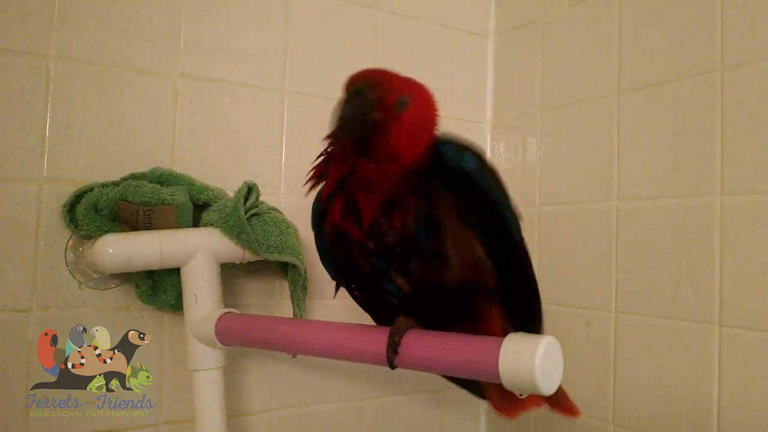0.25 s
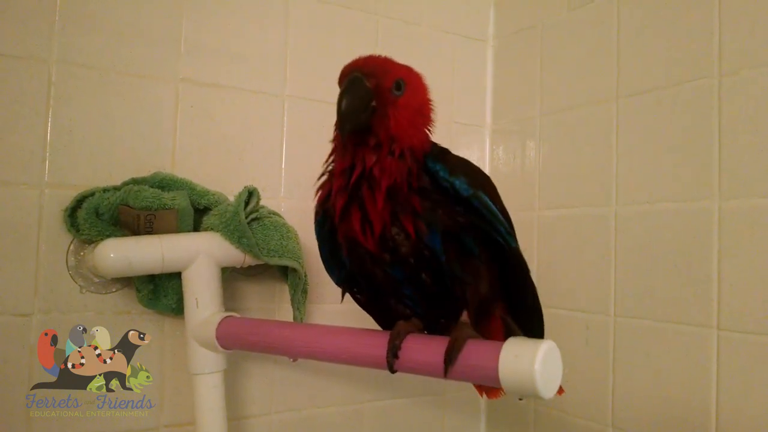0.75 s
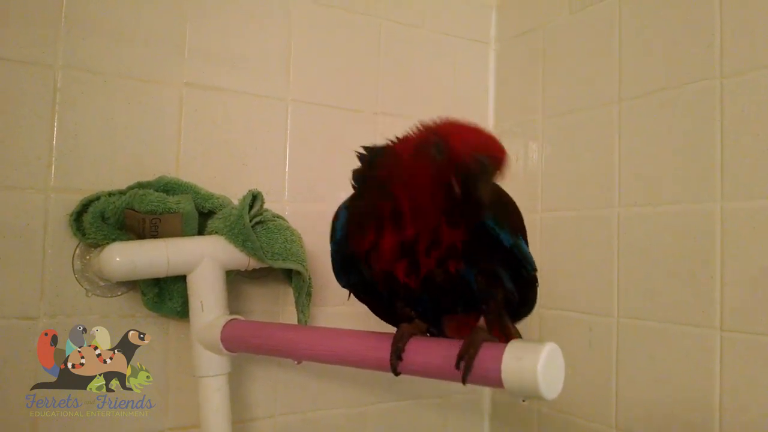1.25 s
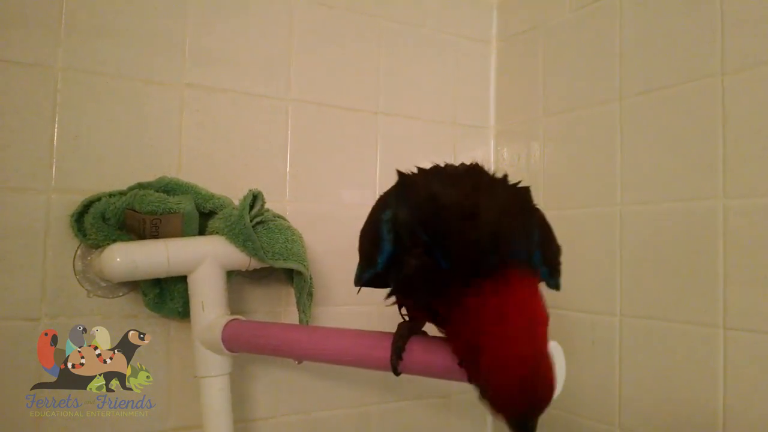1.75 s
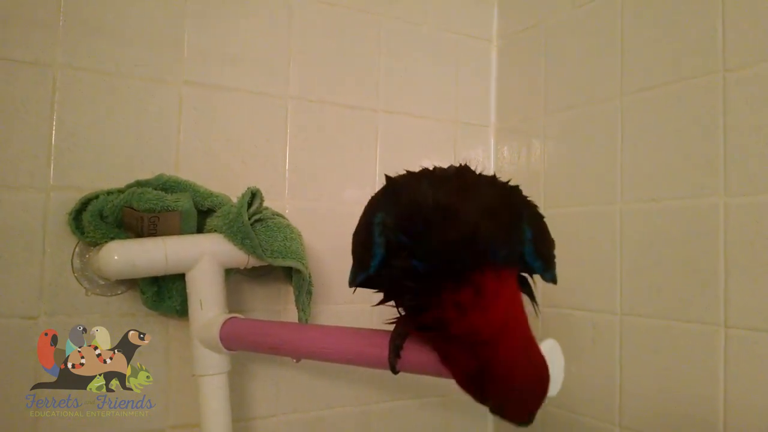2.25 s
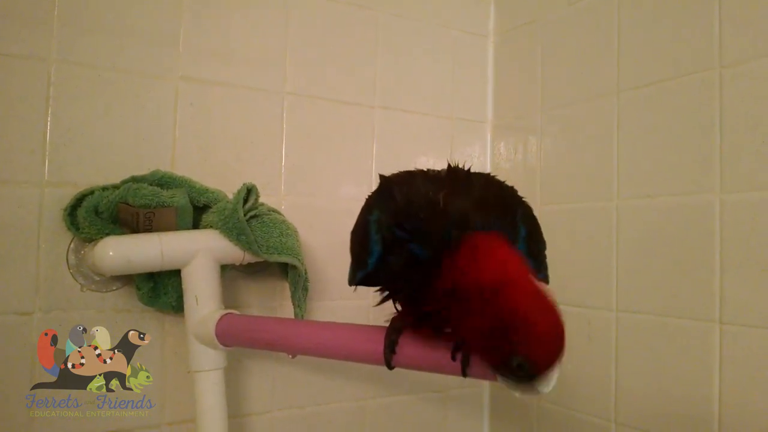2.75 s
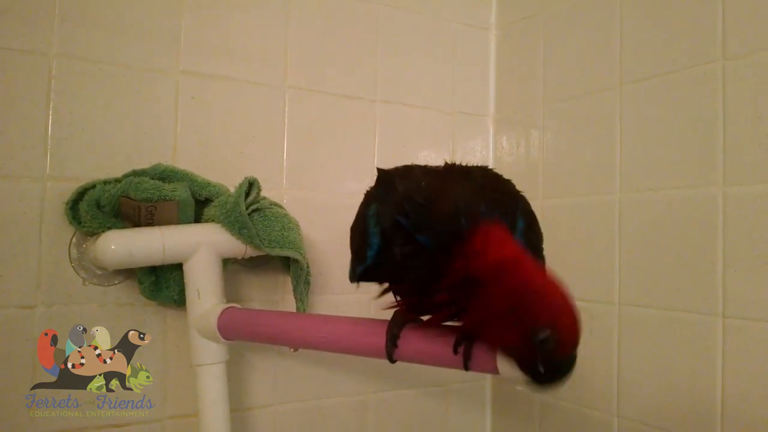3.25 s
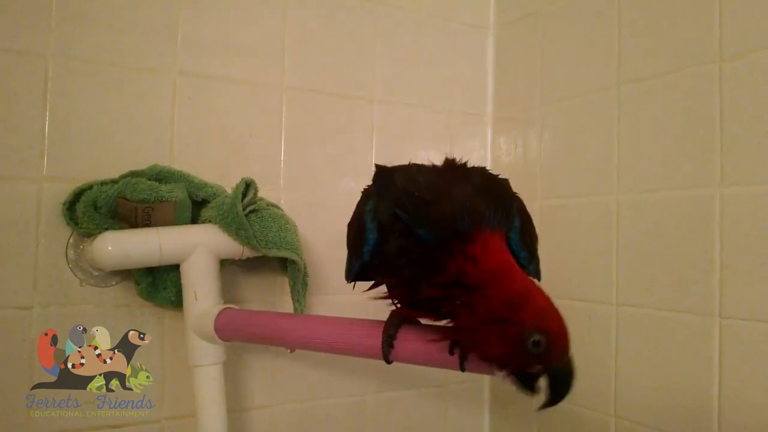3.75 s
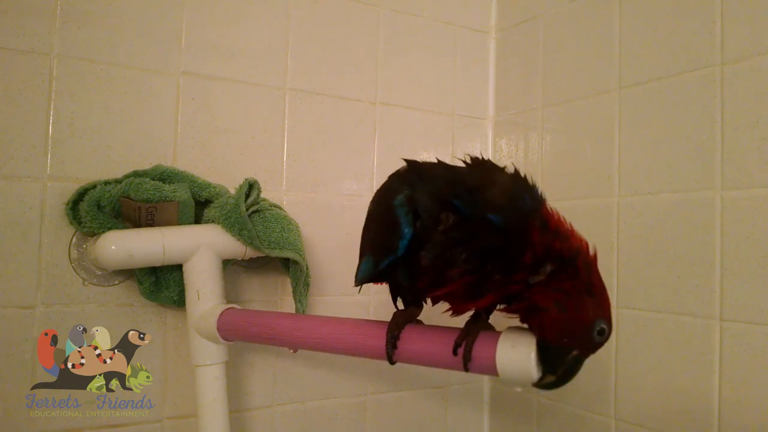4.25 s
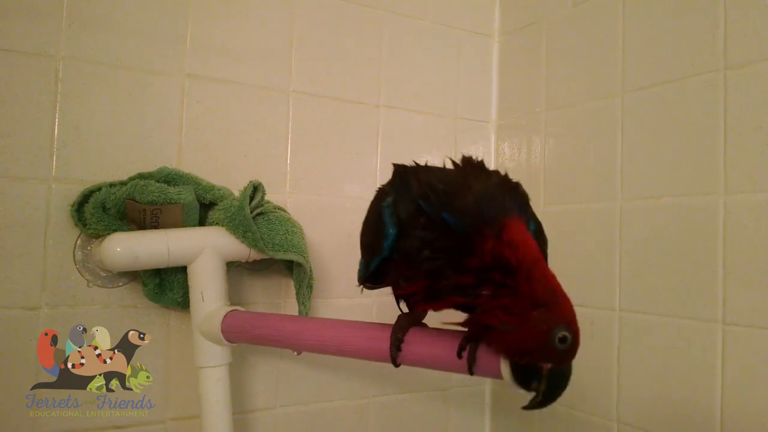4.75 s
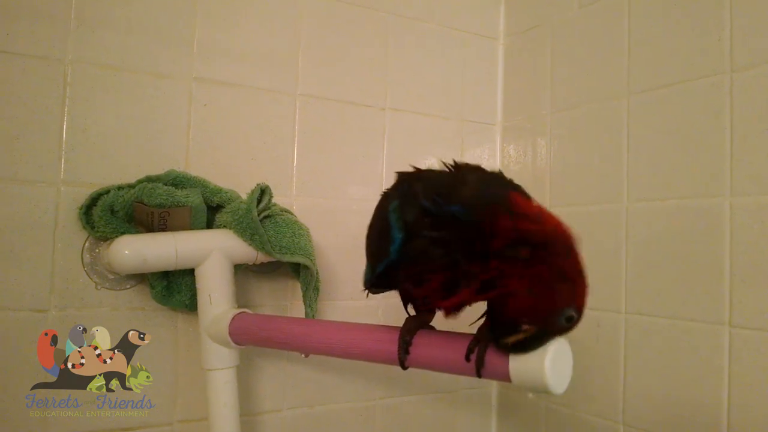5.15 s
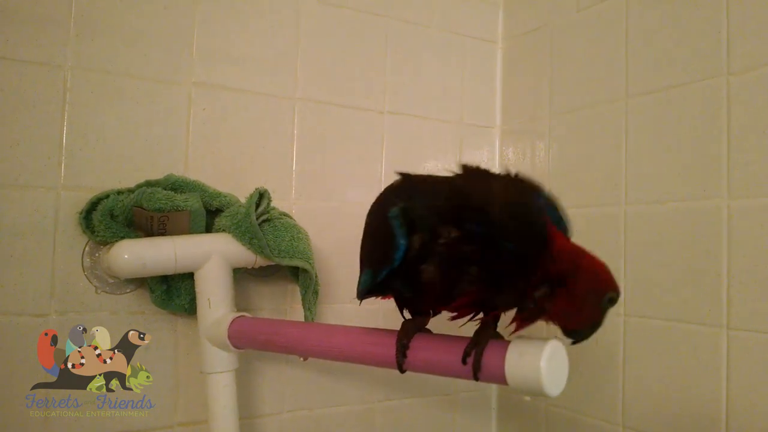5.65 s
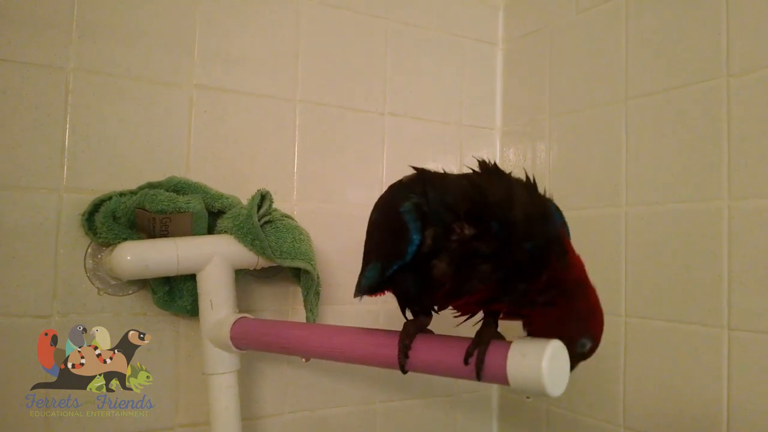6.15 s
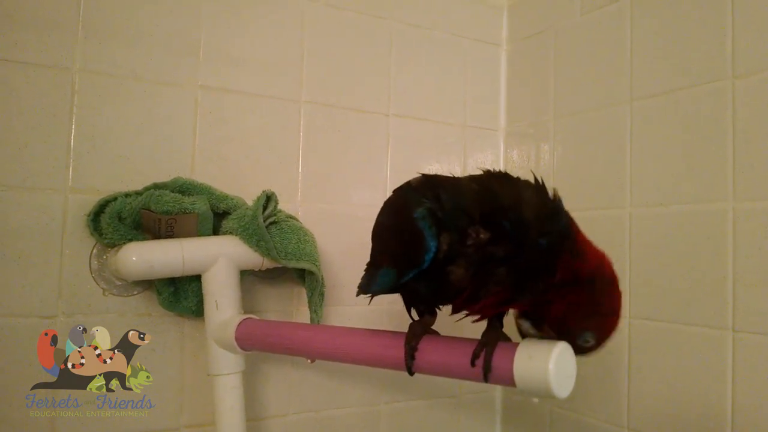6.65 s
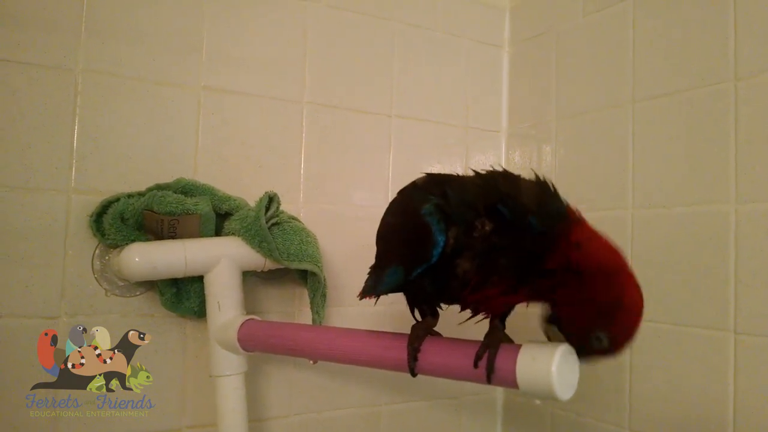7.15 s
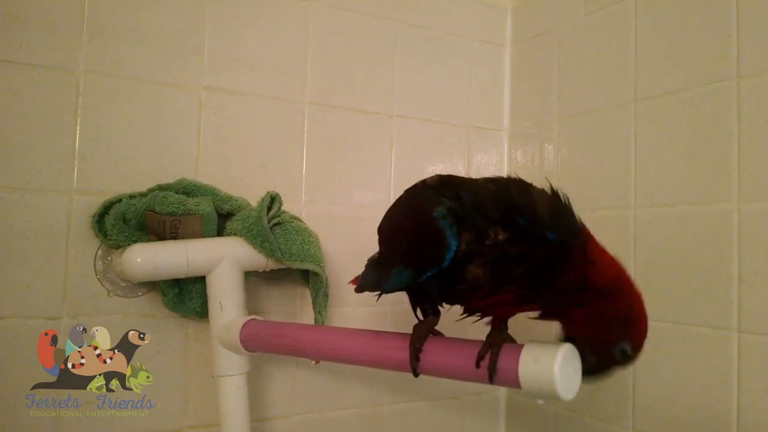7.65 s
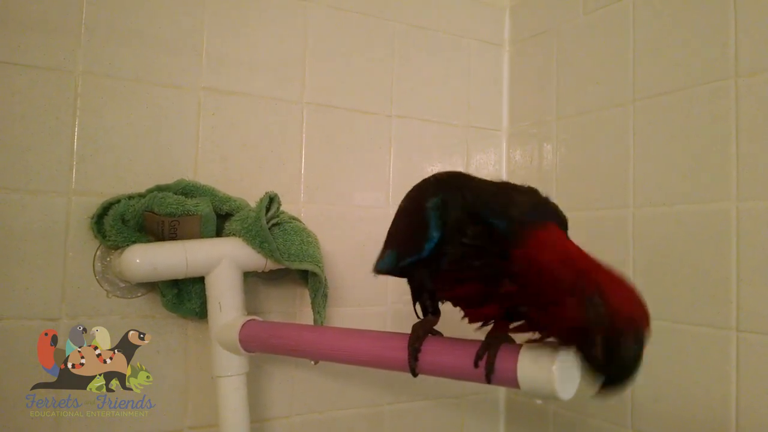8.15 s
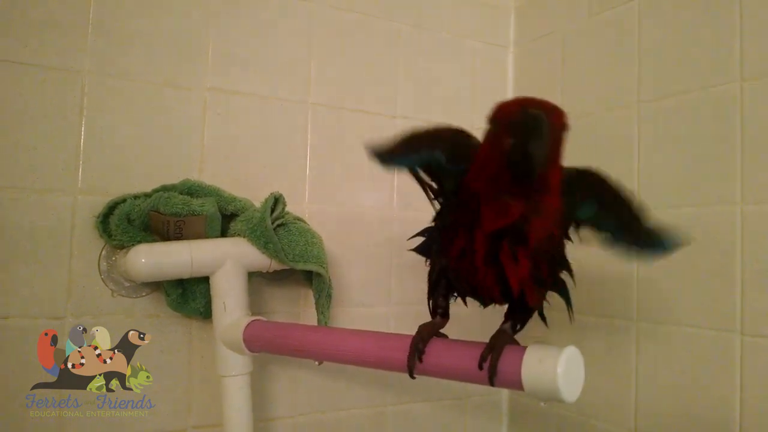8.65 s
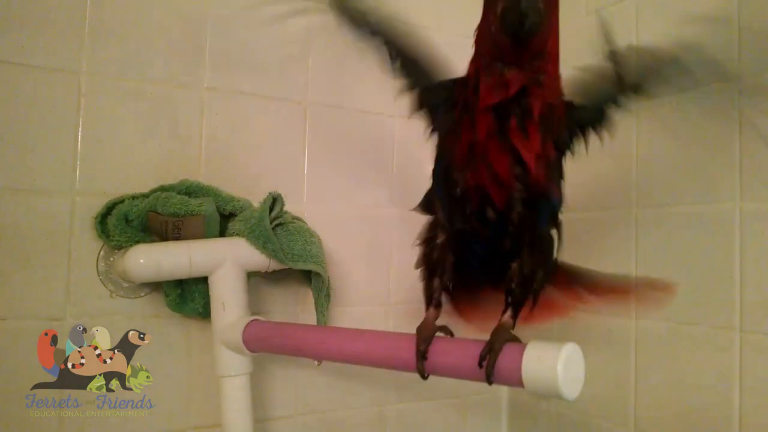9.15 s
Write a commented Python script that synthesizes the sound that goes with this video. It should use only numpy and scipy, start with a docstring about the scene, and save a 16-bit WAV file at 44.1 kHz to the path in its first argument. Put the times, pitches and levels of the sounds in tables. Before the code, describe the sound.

A wet parrot ruffles, taps and wipes its beak on a plastic perch, then flaps, over a fan droning in a tiled shower.

```python
"""A fan drones and water drips in a tiled shower stall while a wet parrot shakes itself, taps and
wipes its beak on a plastic perch and at last beats its wings. The extractor fan makes the air in the
stall ring. Taps and rubs make the perch ring, drops sound as tiny bubbles, and all three echo off the
tiles. Wet feathers swish, crackle and push air. A microphone with two openings (ports) widens it all."""
import sys
import numpy as np
from scipy import signal
from scipy.fft import rfft, irfft, next_fast_len
from scipy.io import wavfile
from scipy.ndimage import map_coordinates

SR = 44100
rng = np.random.default_rng(int(sys.argv[2]) if len(sys.argv) > 2 else 0)


def transcribe(signal):
    """Save signal, clipped to [-1, 1], as a 16-bit WAV file at the path in sys.argv[1]."""
    frames = np.atleast_2d(signal).T
    limited = np.clip(frames, -1, 1)
    pcm = np.round(limited * 32767).astype(np.int16)
    wavfile.write(sys.argv[1], SR, pcm)


N = 414981

# Beak and claws tap the perch; at the end wing feathers snap. Treble and knock are against the main ring.
# (time [s], peak [dB], treble [dB], knock [dB], wipe level [dB], contact length [s]: short is hard)
TAPS = [(0.48, -18.5, -18, -22, -61, 0.00053), (0.578, -32.5, 2, -28, -54.5, 0.0016),
        (1.465, -32, 5, -12, -54, 0.001), (1.835, -31.5, -4, -16, -59, 0.001),
        (2.158, -16.5, -31, -8, -40.5, 0.00094), (2.198, -24, -0.5, -7, -44.5, 0.0035),
        (2.54, -37, -13, -23, -74, 0.0012), (2.567, -37, -18, -10, -75, 0.00092),
        (2.705, -31.5, 0, -20, -73, 0.0012), (2.82, -31, -21, 6, -64, 0.0021),
        (3.3876, -20, -33, -8.5, -57, 0.00032), (4.0786, -14, -3, -13.5, -42.5, 0.0012),
        (4.201, -18, 0.5, -5.5, -48.5, 0.0012), (4.95, -36, -14, -31, -70, 0.0011),
        (4.9555, -27.5, -8, -36, -54, 0.00064), (5.071, -21, -2.5, -2.5, -52, 0.00088),
        (5.321, -29, 16, -19, -55, 0.0013), (5.562, -26, 3, 7, -53, 0.0035),
        (5.636, -26.5, -23, -34, -48.5, 0.0013), (5.943, -35, -12, -25, -54, 0.0011),
        (6.0882, -18, -2.5, -11.5, -40.5, 0.0021), (6.095, -25, -10, -13, -60, 0.0014),
        (6.108, -16.5, -9, -10, -57, 0.00074), (6.203, -13, 5.5, -12, -46, 0.00078),
        (6.332, -24, -23, -10, -40.5, 0.0024), (6.343, -26, -22, -10, -60, 0.0013),
        (6.365, -27.5, -20, 3, -58, 0.0018), (6.379, -14.5, -8, -14, -44, 0.00068),
        (6.449, -29.5, 31, -17, -46.5, 0.0032), (6.49, -24, -3, -20, -42.5, 0.0051),
        (6.498, -22.5, -10, -17, -60, 0.00091), (6.625, -26, -22, -10, -40.5, 0.004),
        (6.637, -20.5, -21, -5, -60, 0.0027), (6.652, -26, -20, -2, -57, 0.0028),
        (6.6695, -12, -10, -10, -46.5, 0.00078), (6.809, -26.5, 3.5, -4, -68, 0.0021),
        (6.903, -37, 4, -23, -44.5, 0.0018), (7.12, -24, -14, -30, -58, 0.0014),
        (7.2998, -27.5, 5, 0, -50, 0.0012), (7.65, -26.5, 22, -19, -55, 0.0024),
        (7.9593, -16, 7.5, -3.5, -47.5, 0.00089), (7.974, -29.5, -10, 15, -70, 0.0034),
        (8.142, -23.5, -1, -7, -52, 0.0018), (8.551, -25, 7, -12, -55, 0.0017),
        (8.666, -27, -8, 15, -57, .001), (8.935, -19, 28, -25, -60, .002),
        (8.981, -18, 1, -23, -60, 0.0017), (9.02, -24, 4, -22, -60, .004), (9.025, -21, 10, -29, -60, .001),
        (9.04, -14, 7, -18, -60, .003), (9.137, -20, 3, -26, -60, 0.0013), (9.181, -18, 1, -17, -60, .0011),
        (9.248, -28, 1, -2, -60, 0.0021), (9.319, -18, -5, -18, -60, 0.0012),
        (9.358, -15.5, 1.5, -12, -60, 0.001)]
# Overlapping swells of feather swish that make up about three wing beats: (time [s], level [dB])
SWISH_SWELLS = [(8.94, -45), (8.985, -39.5), (9.018, -37), (9.045, -40), (9.085, -39.5), (9.145, -38),
                (9.175, -42), (9.25, -40), (9.322, -35), (9.36, -46), (9.405, -44)]
# How the microphone's housing shades the bird: (frequency [Hz], left port against right [dB])
BIRD_SHADE = [(500, 4.5), (2000, -2), (4500, -20.5), (7000, -6.5), (9500, -20), (15000, -7)]
RUB_TIME = np.arange(-4410, 4410) / SR  # seconds before and after the moment of a rub


def amp(db):
    """Turns decibels into a gain."""
    return 10 ** (np.asarray(db) / 20)


def along(points, hz):
    """Reads a curve of (frequency, value) points on a log frequency axis."""
    f, v = np.transpose(points)
    return np.interp(np.log(hz + 1), np.log(f + 1), v)


def wobble(rate):
    """A smooth random curve through `rate` points a second."""
    return map_coordinates(rng.standard_normal(int(N * rate / SR) + 4), [np.arange(N) * rate / SR])


def filtered(x, response):
    """Scales and delays each frequency of x as `response` says."""
    m = next_fast_len(x.shape[-1] + 8192)
    return irfft(rfft(x, m) * response(np.fft.rfftfreq(m, 1 / SR)), m)[..., :x.shape[-1]]


def resonance(f, hz, width):
    """A filter that rings at hz, with a peak gain of 1."""
    return 1j * f * width / (hz * hz - f * f + 1j * f * width)


def shaded(pair, shade):
    """The housing changes the tone at the left port only."""
    return filtered(pair, lambda f: [amp(along(shade, f)), np.ones_like(f)])


def diffuse(pair, spectrum, shade):
    """Two unrelated noises become sound from all around, alike at both ports in the bass."""
    # How alike the ports sound: (frequency [Hz], likeness [0 to 1])
    likeness = [(25, 0.99), (100, 0.98), (550, 0.99), (800, 0.56), (1300, 0.034), (3000, 0.11)]
    turn = lambda f: np.arccos(along(likeness, f)) / 2
    mid, side = filtered(pair, lambda f: amp(along(spectrum, f)) * [np.cos(turn(f)), np.sin(turn(f))])
    return shaded(np.array([mid + side, mid - side]), shade)


def place(out, start, sound, wet_db):
    """Adds a sound to both ports, with tile echoes at wet_db against it."""
    # Echoes off the tiles: (frequency [Hz], time to fade by 60 dB [s])
    fade_times = [(300, 0.16), (2000, 0.23), (6000, 0.15), (13000, 0.0057)]
    hz, t, noise = signal.stft(rng.standard_normal((2, SR // 4)), SR, nperseg=128)
    tail = signal.istft(noise * amp(-60 * t / along(fade_times, hz)[:, None]), SR, nperseg=128)[1]
    tail /= np.linalg.norm(tail[1])
    pair = amp(wet_db) * signal.fftconvolve(np.pad(sound, (90, 0))[None], tail, axes=1)
    pair[0, 5:len(sound) + 5] += sound  # reaches the left port 5 samples later
    pair[1, :len(sound)] += sound
    out[:, max(round(start * SR), 0):][:, :pair.shape[1]] += pair


def perch(force, treble_db, bare_db, knock_db=-30):
    """A touch rings the hollow plastic pipe; its own bare, bright sound lies on top."""
    # The pipe's knock, main ring, upper ring and the beak edge's treble: (pitch [Hz], width [Hz])
    rings = [(1590, 4300), (3750, 3230), (6500, 2400), (9560, 1440)]
    knock, main, upper, edge = rings
    ringing = filtered(force, lambda f: (
        resonance(f, *main) ** 2
        - amp(knock_db) * resonance(f, *knock) ** 2
        - amp(-6.5 + 0.85 * treble_db) * resonance(f, *upper)
        + amp(treble_db) * resonance(f, *edge) * f / (f - 5000j)))
    return ringing + amp(treble_db + bare_db) * np.diff(force, 2, append=[0, 0])


def fan():
    """Fan noise rings the air in the stall at many pitches, with a hiss around them."""
    # The stall's resonances: (pitch [Hz], width [Hz], level [dB], right port against left [dB])
    stall = [(25.5, 6, -61.5, 0.5), (93, 8, -63, 2), (119.3, 6.1, -61.5, 1.5), (138, 17.5, -73, 4.5),
             (249.8, 12.4, -70.1, 3.4), (271.0, 4.0, -70.1, 5.3), (318.0, 6.2, -81.1, 7.7),
             (349.5, 7.0, -57.7, -0.2), (372.5, 12.3, -66.1, -4.2), (408.1, 7.9, -69.5, 1.7),
             (440.0, 6.6, -62.8, 2.7), (459.0, 28.0, -66.8, 3.5), (489.9, 6.2, -58.5, 2.2),
             (502.5, 5.7, -58.3, -2.7), (530.0, 6.9, -60.1, 6.6), (554.0, 6.1, -64.4, 3.6),
             (581.6, 4.0, -61.1, 6.2), (594.1, 4.0, -53.8, -15.0), (615.2, 5.1, -71.3, 14.2),
             (632.0, 6.0, -74.5, 8.8), (653.2, 11.7, -66.0, -11.8), (679.1, 14.8, -69.4, -15.0),
             (724.0, 10.3, -70.2, -2.3), (741.0, 15.0, -70.5, -1.0), (783.9, 22.0, -74.0, -1.1),
             (839.9, 27.9, -81.4, 5.8), (901.9, 16.8, -86.0, 15.0), (945.3, 16.1, -75.1, -12.1),
             (985.6, 11.0, -90.2, 15.0), (1021.1, 10.9, -82.0, -0.4)]
    # The fan's hiss: (frequency [Hz], level [dB per Hz])
    hiss_spectrum = [(20, -62), (60, -64.5), (110, -80.5), (200, -77), (500, -74), (800, -81), (1250, -88),
                     (1720, -89), (2000, -95), (4500, -99.5), (7500, -99), (10000, -95), (16000, -103)]
    # How the housing shades it: (frequency [Hz], left port against right [dB])
    hiss_shade = [(200, -1.5), (1500, -6), (5000, 1), (9000, -8.5), (15000, -6.5)]
    air = rng.standard_normal((5, N)) * np.sqrt(SR / 2)  # power of 1 per Hz
    hiss = diffuse(air[3:] * amp(0.6 * wobble(6.6)), hiss_spectrum, hiss_shade)
    drive = (air[0] + 0.2 * air[1:3]) * amp(0.34 * wobble(5.3))  # mostly the same at both ports
    ring = lambda f: sum((-1) ** k * amp([[db], [db + right_db]]) * resonance(f, hz, width)
                         for k, (hz, width, db, right_db) in enumerate(stall))
    return filtered(drive, ring) + hiss


def bell(t, spread_s):
    """A smooth rise and fall around t = 0."""
    return np.exp(-(t / spread_s) ** 2 / 2)


def slipping():
    """The uneven strength of rubbing; now and then the beak catches with a crack."""
    slips = amp(3 * wobble(400) + 2.6 * wobble(130) + 2 * wobble(45))
    return slips * (1 + 3 * (rng.random(N) < .01))


def scrape(out, slips, when, shape, db, treble_db, wet_db=-0.5):
    """One swell of rubbing noise, coloured by the perch."""
    t = when + RUB_TIME
    uneven = np.take(slips, np.round(t * SR).astype(int), mode="wrap")
    rub = perch(rng.standard_normal(len(t)) * uneven * shape, treble_db, bare_db=-26.5)
    rub *= amp(db) * np.sqrt(np.mean(shape ** 2) / np.mean(rub ** 2))
    place(out, t[0], rub[t >= 0], wet_db)


def rubs(out, slips):
    """Feathers and beak rub softly, with no tap."""
    # Each rub: (middle time [s], level [dB], treble against the main ring [dB])
    strokes = [(0.019, -48.5, 5), (0.101, -50.5, 9), (0.172, -47.5, 7), (0.249, -51, 8), (0.334, -54, 12),
               (.42, -53.5, 7), (1.721, -57.5, 11), (2.499, -52.5, 3), (2.88, -52.5, 4), (3.63, -53, -29),
               (4.059, -55.5, -4), (4.489, -57.5, 2), (4.65, -55, 0), (5.409, -53.5, 16), (5.485, -48, 2),
               (5.824, -54.5, 10), (6.0, -53.5, -17), (6.535, -47, 2), (6.615, -48, 10), (6.815, -48, 6),
               (7.145, -41, 6.5), (7.361, -51.5, 7), (7.45, -43, 1.5), (7.635, -49, 1.5), (7.79, -51.5, -8),
               (7.82, -43, 2.5), (7.934, -51.5, 2), (8.125, -55, -4), (8.37, -55.5, 8), (8.472, -44.5, 8),
               (8.582, -42.5, 7), (8.905, -45.5, 5.5), (9.161, -44, 3)]
    for when, db, treble_db in strokes:
        scrape(out, slips, when, bell(RUB_TIME, spread_s=0.029), db, treble_db)


def shake(out, slips):
    """The bird shakes itself: wet feathers slap four times, each softer than the last."""
    slap = bell(RUB_TIME, spread_s=.0026)
    for k in range(4):
        scrape(out, slips, when=.0595 + .0838 * k, shape=slap, db=-32.5 - 1.5 * k,
               treble_db=-2, wet_db=-10)


def taps(out):
    """Each tap is a short, gritty crack that rings the perch; the feather snaps share this tone."""
    t = np.arange(2048) / SR
    offset_s = .0004  # each tap sounds this long after its listed time
    for when, db, treble_db, knock_db, _, length in TAPS:
        grit = rng.standard_normal(len(t))
        grit *= np.repeat(amp(4.0 * rng.standard_normal(len(t) // 16)), 16)  # the contact stutters
        crack = 0.45 * grit * t / length * np.exp(1 - t / length) ** 1.22
        crack[0] += (0.0017 / length) ** 2  # harder taps start with a stronger click
        tap = perch(crack, treble_db, bare_db=-25.5, knock_db=knock_db)
        place(out, when + offset_s, amp(db) * tap / abs(tap).max(), wet_db=-8.5)


def wipes(out, slips, peak_s=0.016):
    """Each tap drags on into a wipe that swells quickly and trails off."""
    drag = np.maximum(RUB_TIME, 0) / peak_s * np.exp(1 - np.abs(RUB_TIME) / peak_s)
    for when, _, treble_db, _, db, _ in TAPS:
        scrape(out, slips, when, drag, db, treble_db=6.5 + 0.21 * treble_db)


def drips(out):
    """Drops on wet tile ring as short, splashy bubbles of rising pitch."""
    # Each drop: (time [s], level [dB], starting pitch [Hz], time to fade by 60 dB [s])
    drops = [(0.547, -40, 2900, 0.032), (1.631, -29, 3250, 0.0077), (1.93, -42, 2900, 0.03),
             (2.632, -44, 1820, 0.045), (5.70, -39, 2680, 0.03), (6.922, -43.5, 2470, 0.15),
             (7.249, -37, 3010, 0.031), (8.657, -21.5, 6080, 0.0063)]
    t = np.arange(2048) / SR
    for when, db, hz, fade_s in drops:
        bubble = np.sin(2 * np.pi * hz * t * (1 + 2.2 * t))
        splash = 1 + 0.46 * rng.standard_normal(len(t))
        envelope = amp(db - 60 * t / fade_s) * (1 - np.exp(-t / 0.000098))
        place(out, when, bubble * splash * envelope, wet_db=-1)


def thuds():
    """The perch shifts and thuds on its mount, which rings at two low pitches."""
    # Each thud: (middle time [s], level [dB])
    jolts = [(4.24, -39), (5.6, -37), (6.11, -40), (6.68, -39), (8.19, -39)]
    out, t = np.zeros(N), np.arange(N) / SR
    for when, db in jolts:
        low, high = (np.sin(2 * np.pi * (hz * t + rng.random())) for hz in (90, 160))
        out += amp(db) * (low + amp(-5) * high) * bell(t - when, spread_s=.025)
    return out


def wings():
    """Wet feathers swish, fizz, crackle and churn the air as the wings beat."""
    # Feather swish: (frequency [Hz], relative level [dB])
    swish = [(500, -22), (1200, -7), (2500, -8.5), (4200, -1.5), (6400, -3), (8000, -9), (16000, -37)]
    # High feather fizz: (frequency [Hz], relative level [dB])
    fizz = [(4000, -20), (7200, -6), (9100, 3), (11000, -4), (13000, -23), (16000, -28)]
    # Churned air: (frequency [Hz], relative level [dB])
    churn = [(30, 4), (110, -1.5), (250, 0.5), (600, -7), (1500, -17), (2500, -15), (4000, -9)]
    feathers = friction(swish, grain_db=1.0) + amp(0.5) * friction(fizz, grain_db=-0.5)
    feathers += amp(-3) * crackle(count=300)
    air = amp(2) * friction(churn, grain_db=3.5)
    return swells(rise_db_per_s=700) * feathers + swells(rise_db_per_s=255) * air


def swells(rise_db_per_s, fall_db_per_s=225):
    """The loudness of the wings: overlapping swells that each rise, then fade more slowly."""
    t = np.arange(N) / SR
    return sum(amp(db - np.where(t < when, rise_db_per_s * (when - t), fall_db_per_s * (t - when)))
               for when, db in SWISH_SWELLS)


def friction(spectrum, grain_db):
    """Noise made grainy by slips of a few milliseconds, at strength 1 in the right port."""
    slips = amp(grain_db * wobble(350) + 1.7 * wobble(30))
    pair = diffuse(rng.standard_normal((2, N)) * slips, spectrum, BIRD_SHADE)
    return pair / np.std(pair[1])


def crackle(count, middle_hz=8000, fade_cycles=4.0):
    """Wet feather barbs part with tiny snaps, each nearer one port or the other."""
    first, t = (SWISH_SWELLS[0][0] - .1) * SR, np.arange(256) / SR
    starts = (first + rng.random(count) * (N - first)).astype(int)
    hz = np.clip(middle_hz * np.exp(0.3 * rng.standard_normal((count, 1))), 5500, 15000)
    size = amp(2.6 * rng.exponential(size=(count, 1)))
    side_db = 3.1 * rng.standard_normal((count, 1))
    snaps = size * np.sin(2 * np.pi * hz * t) * np.exp(-hz * t / fade_cycles)
    samples = (starts[:, None] + np.arange(len(t))).ravel()
    pair = [np.bincount(samples, (snaps * amp(db)).ravel(), N)[:N] for db in (side_db, -side_db)]
    pair = shaded(np.array(pair), BIRD_SHADE)
    return pair / np.std(pair[1, starts.min():])


def gusts():
    """The wings push the air in low, single pulses."""
    # Each push: (time [s], level [dB], length [s])
    pushes = [(8.98, -30, 0.0025), (9.069, -21, 0.0027), (9.148, -22.5, 0.0061), (9.183, -26, 0.0011),
              (9.329, -23, 0.0081)]
    t = np.arange(N) / SR
    return sum(amp(db) * (((t - when) / length) ** 2 - 1) * bell(t - when, length)
               for when, db, length in pushes)


def scene():
    """Everything as it arrives at the two ports."""
    mix = fan() + wings()
    mix += amp([[-5], [0]]) * (thuds() + gusts())  # mostly at the right port
    contacts = np.zeros((2, N + SR))
    taps(contacts)
    drips(contacts)
    slips = slipping()
    wipes(contacts, slips)
    shake(contacts, slips)
    rubs(contacts, slips)
    return mix + shaded(contacts[:, :N], BIRD_SHADE)


def record(dry):
    """Each side subtracts a delayed share of the other port, which aims it sideways."""
    # Feed from the other port: (frequency [Hz], share [0 to 1])
    cross_feed = [(100, 0.73), (1300, 0.56), (2640, 1), (4100, 0.71), (5200, 0.44), (8000, 0.24),
                  (15000, 0.025)]
    delay_s, top_hz = 1 / 2640, 15500
    ports = filtered(dry, lambda f: 1 + 0.42 * resonance(f, 5030, 920))  # the hollow ports ring
    other = filtered(ports[::-1], lambda f: along(cross_feed, f) * np.exp(-2j * np.pi * f * delay_s))
    return filtered(ports - other, lambda f: f < top_hz)


dry = scene()
out = record(dry)
transcribe(out)
```